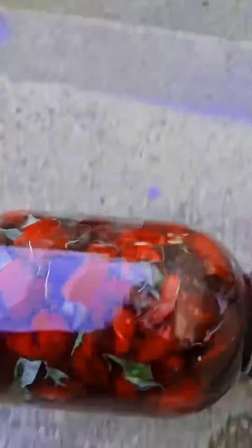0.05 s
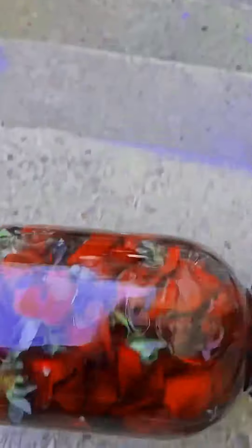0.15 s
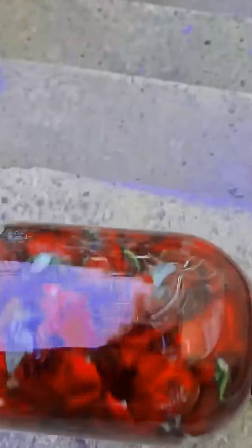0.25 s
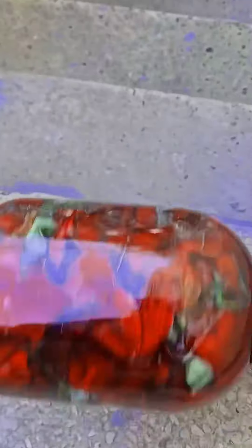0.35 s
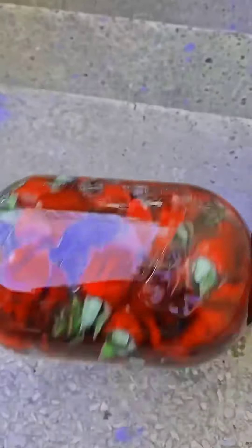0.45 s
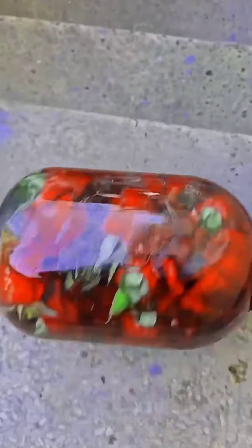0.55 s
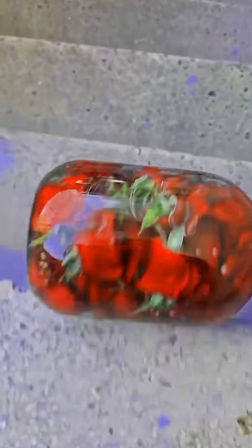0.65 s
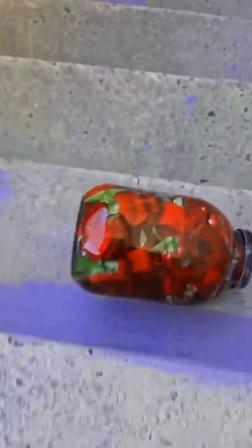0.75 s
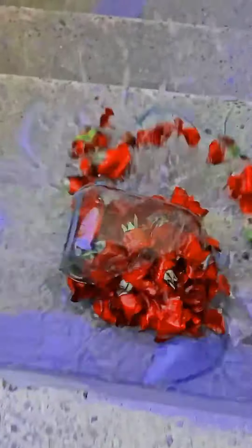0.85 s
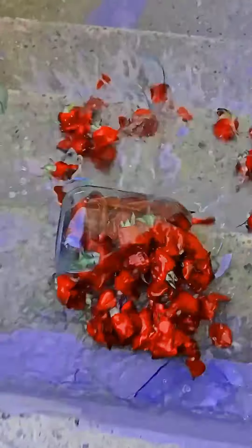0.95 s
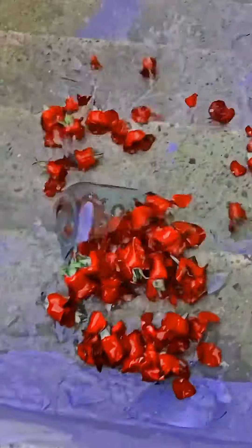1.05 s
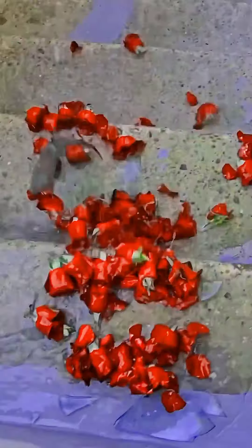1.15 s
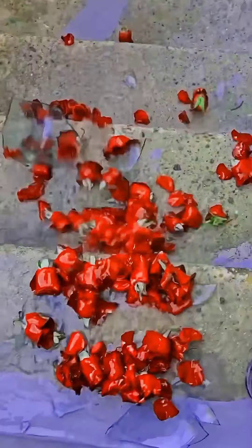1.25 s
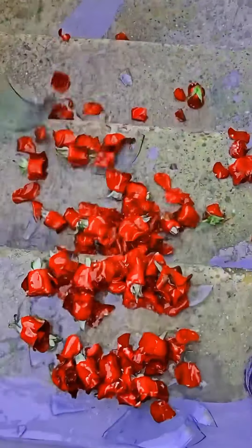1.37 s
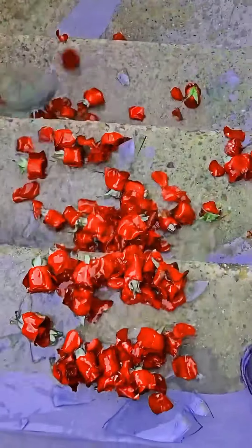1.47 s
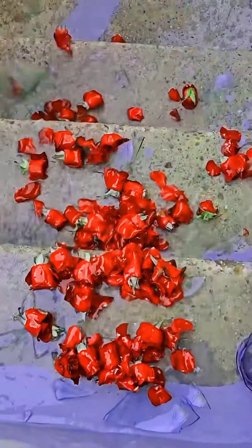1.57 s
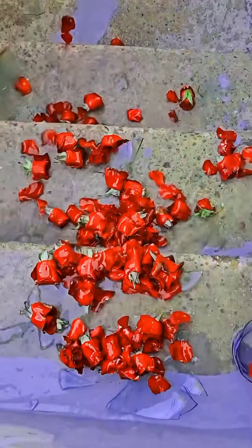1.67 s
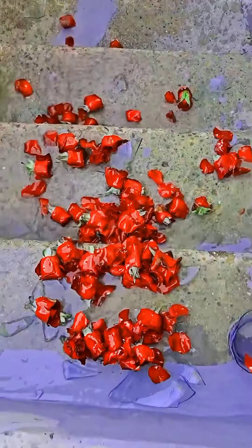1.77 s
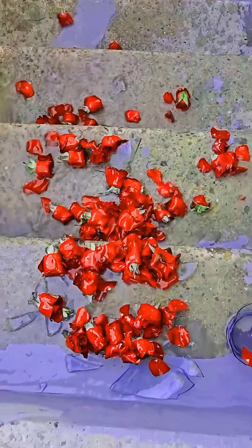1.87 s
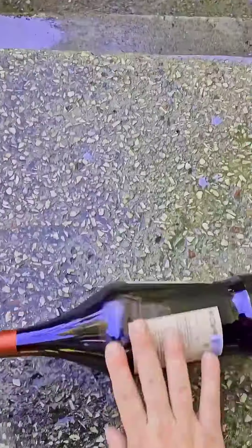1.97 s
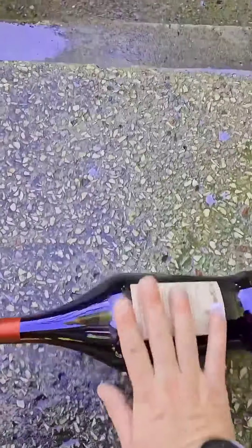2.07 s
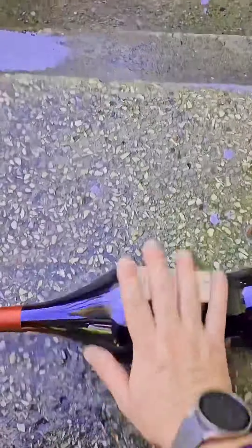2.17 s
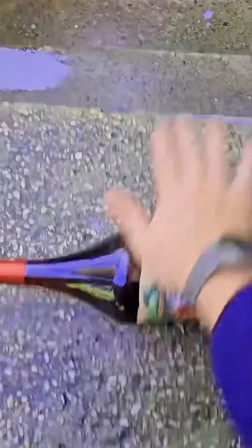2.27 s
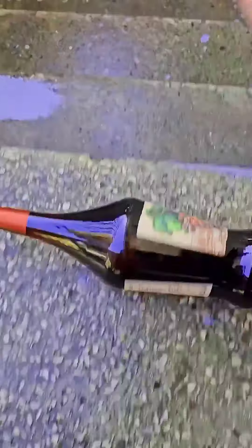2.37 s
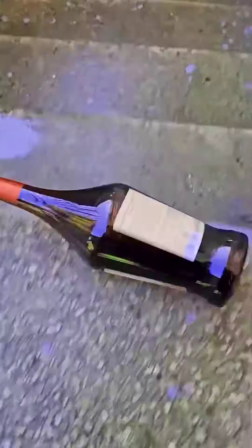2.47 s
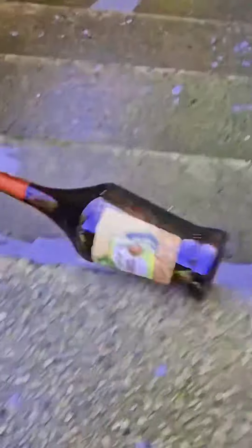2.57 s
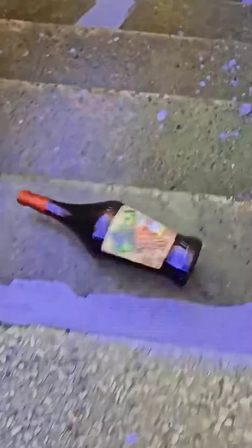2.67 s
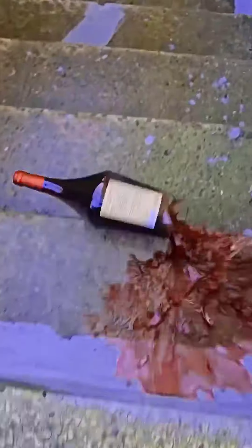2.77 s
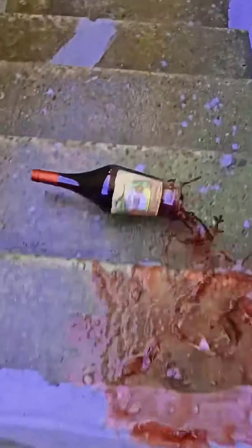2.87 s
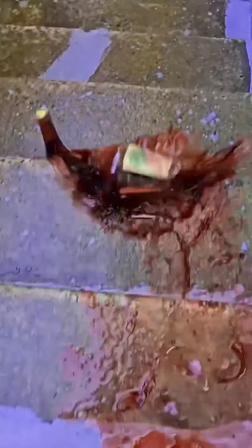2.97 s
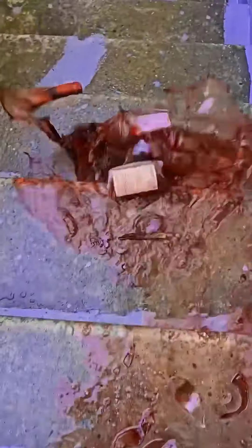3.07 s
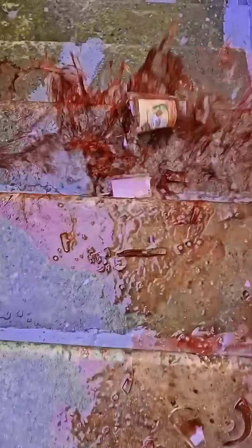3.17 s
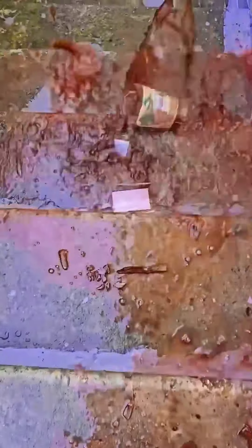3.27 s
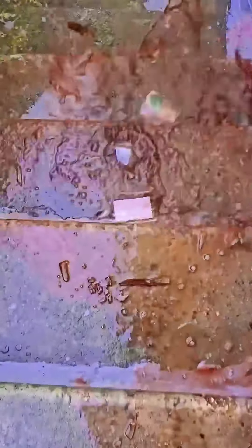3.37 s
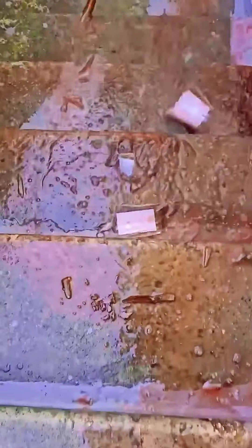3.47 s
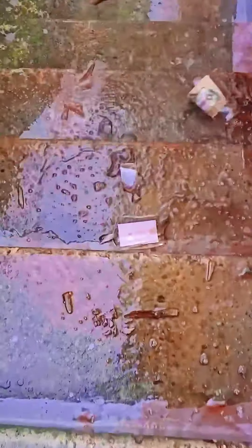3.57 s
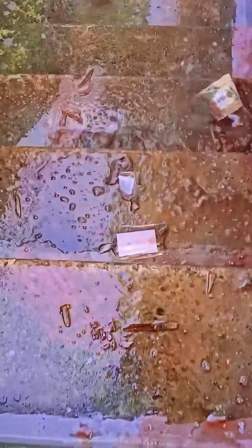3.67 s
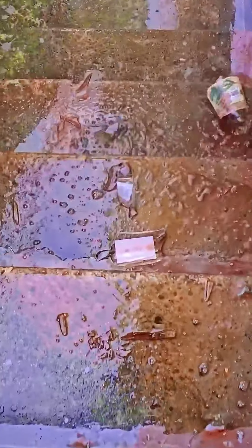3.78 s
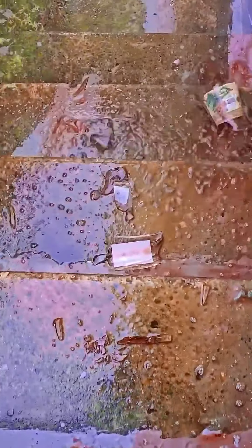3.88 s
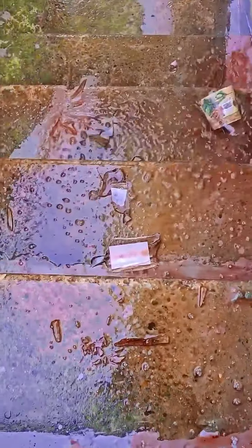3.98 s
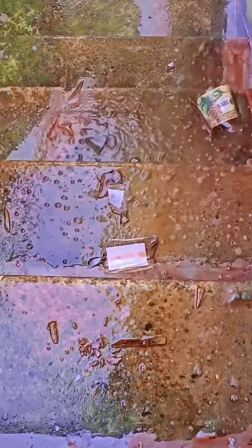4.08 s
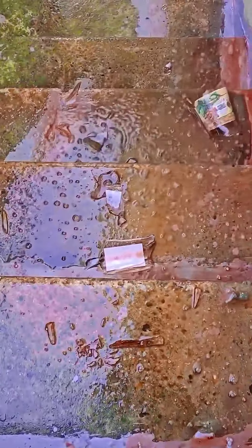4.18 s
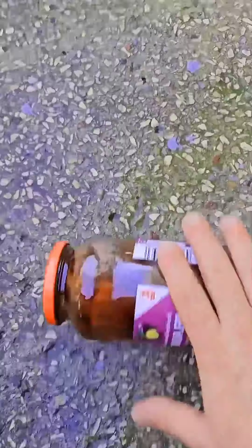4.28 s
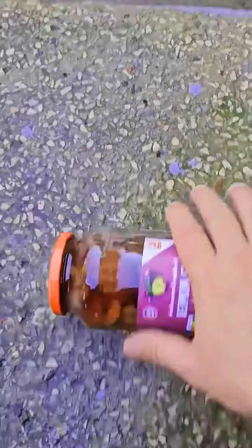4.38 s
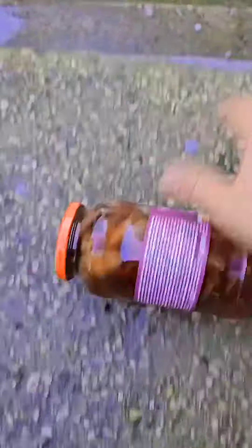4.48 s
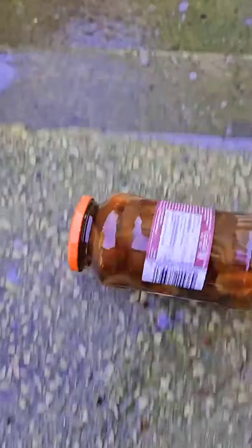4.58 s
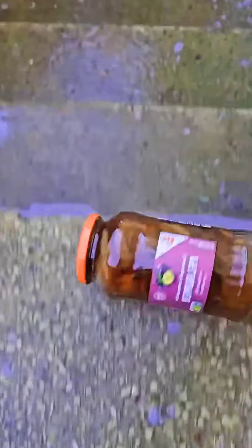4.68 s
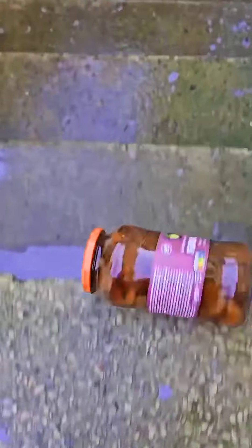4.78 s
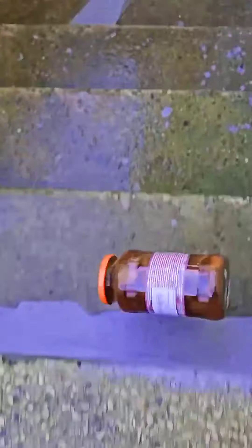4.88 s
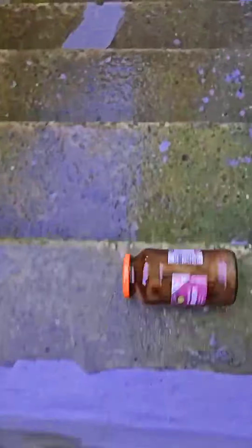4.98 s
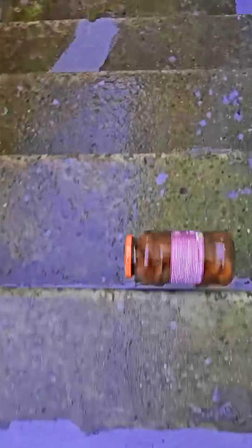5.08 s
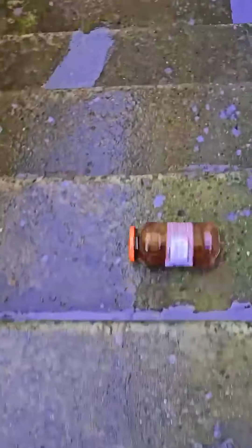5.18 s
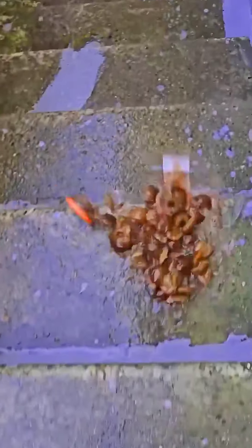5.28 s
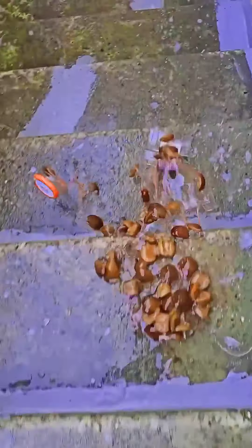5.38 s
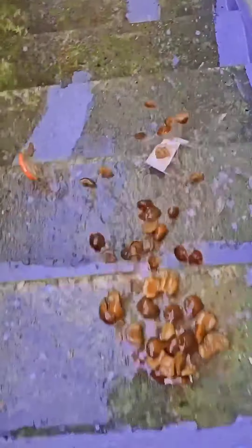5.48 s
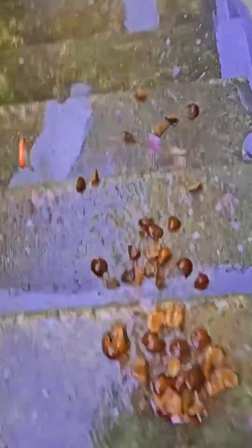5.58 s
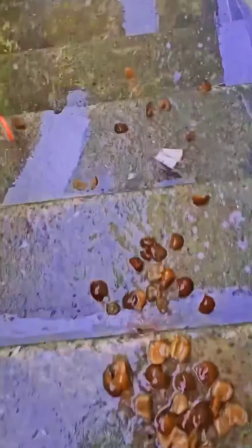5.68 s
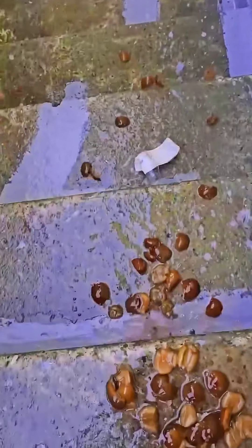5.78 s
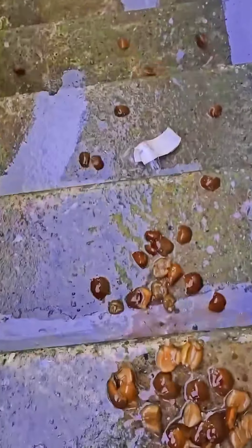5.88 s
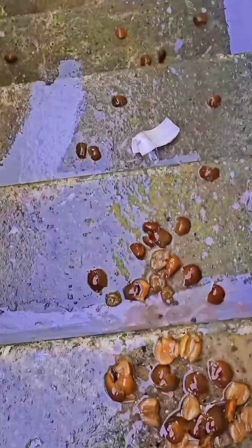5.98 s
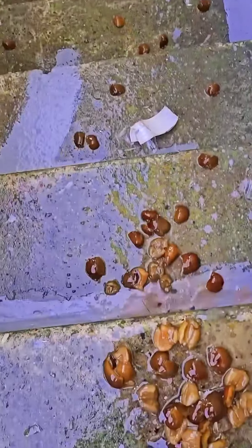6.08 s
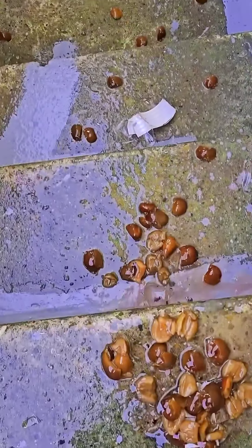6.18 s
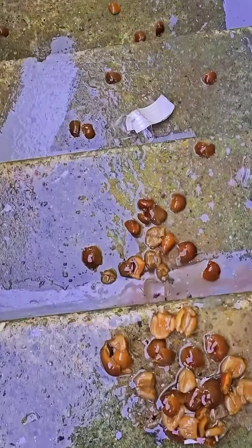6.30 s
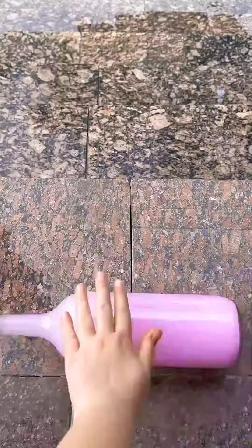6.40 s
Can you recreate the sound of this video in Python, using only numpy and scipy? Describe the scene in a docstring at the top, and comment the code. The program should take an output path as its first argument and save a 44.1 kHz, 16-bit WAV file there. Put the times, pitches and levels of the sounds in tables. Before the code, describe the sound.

Close outdoor sound of glass breaking on concrete stairs. A large filled jar rolls with a gritty rumble and shatters into a long, bright jangle of shards. A wine bottle then rattles, bursts and gurgles, its thick base ringing as it bounces. Finally a smaller jar rolls, knocks hard and bursts with a wet thump, scattering chips and clonking its metal lid. Short stairway echo, low air rumble.

```python
"""Over a low outdoor rumble a glass jar rolls on rough concrete, knocks against stone steps and bursts.
A wine bottle and a second jar follow. Rolling is a train of damped contact pulses; each burst is shaped
noise in four bands with cracks, chips and wet contents, and the wine gurgles as rising bubbles. Shards, the
bottle's base and a metal lid are sums of decaying modes. The stairway adds a short echo."""
import sys
import numpy as np
from scipy import signal
from scipy.fft import rfft, irfft
from scipy.io import wavfile
from scipy.ndimage import uniform_filter1d

SR = 44100
rng = np.random.default_rng(int(sys.argv[2]) if len(sys.argv) > 2 else 0)


def master(y):
    """Save y as 16-bit WAV."""
    cut = np.clip(np.atleast_2d(y).T, -1, 1)
    pcm = np.round(cut * 32767)  # scale
    wavfile.write(sys.argv[1], SR, pcm.astype(np.int16))


N = 284136
T = np.arange(N) / SR
FREQS = np.fft.rfftfreq(N, 1 / SR)
TOP_HZ = 16100  # top of the recorded range


def undb(db):
    """Decibel law: 20 dB is a factor of ten in amplitude."""
    return 10 ** (np.asarray(db) / 20)


def unit(x):
    """Normalisation to a root mean square of one."""
    return x / np.sqrt(np.mean(x ** 2))


def add(out, s, sound):
    """Superposition: mix a sound in at time s."""
    i = max(int(s * SR), 0)
    n = max(min(sound.shape[-1], N - i), 0)
    out[:, i:i + n] += sound[..., :n]


def pan(db):
    """Level difference: gains of left and right, left stronger by db."""
    return unit(undb(np.array([[db], [-db]]) / 2))


def lagged(x, count):
    """Time difference: sound from the left reaches the right microphone a few samples later."""
    return np.array([x[0], np.roll(x[1], count)])


def band(x, lo_hz, hi_hz, order=3):
    """Causal band-pass filtering."""
    edges = [lo_hz, min(hi_hz, SR / 2 - 100)]
    return signal.sosfilt(signal.butter(order, edges, "band", fs=SR, output="sos"), x)


def spread(pair, side):
    """Decorrelation: two unrelated signals as middle and side."""
    return unit(pair[0] + side * pair[1] * np.array([[1], [-1]]))


def moments(start, end, rate):
    """Jittered timing: irregular times from start to end, about rate a second."""
    slots = np.arange(start, end, 1 / rate)
    return slots + rng.random(len(slots)) / rate


def flicker(depth_db, step_s):
    """Random modulation: a gain that drifts to a new random level every step_s seconds."""
    steps = np.arange(0, T[-1], step_s)
    levels = np.minimum(rng.standard_normal(len(steps)), 1.5)
    return undb(depth_db * np.interp(T, steps, levels))


def ring(modes, width=0.063, attack=0.00016):
    """Modal decay: modes (Hz, dB, t60 s), each reaching the two microphones with its own phase."""
    hz, db, t60 = np.transpose(modes)
    t = T[:int(t60.max() * SR)]
    phase = rng.uniform(0, 2 * np.pi, len(hz)) + width * rng.standard_normal((2, len(hz)))
    pole = np.exp((2j * np.pi * hz - np.log(1000) / t60) / SR)
    decay = np.cumprod(np.repeat(pole[:, None], len(t), axis=1), axis=1)
    strength = (hz < TOP_HZ) * undb(db) * np.exp(1j * phase)
    return (strength @ decay).imag * (1 - np.exp(-t / attack))


def knock(hz, db, peak_cycles=0.52, sharp=1.9):
    """Heavy damping: the blow dies within a few swings; sharp narrows its envelope."""
    cycles = T[:int(10 * SR / hz)] * hz
    envelope = (cycles / peak_cycles * np.exp(1 - cycles / peak_cycles)) ** sharp
    return undb(db) * np.sin(2 * np.pi * cycles) * envelope


def shard(hz, db, t60, partner_db, attack, count=5):
    """Inharmonic plate modes: one strong mode and a few others at unrelated pitches."""
    other_hz = rng.uniform(min(hz * 1.1, 4000), min(hz * 3.6, TOP_HZ), count)
    other_db = db + partner_db + 3 * rng.standard_normal(count)
    others = np.c_[other_hz, other_db, t60 * rng.uniform(.5, 1, count)]
    return ring(np.vstack([(hz, db, t60), others]), width=1.13, attack=attack)


def chatter(note, depth, top_hz):
    """Amplitude modulation: a ringing piece trembles against the stone, so its tone flutters."""
    return note * (1 + depth * unit(band(rng.standard_normal(note.shape[1]), 30, top_hz, order=1)))


def choked(note, free_s, choke_s):
    """Contact damping: a note rings freely, then a new contact damps it."""
    return note * np.exp(-np.maximum(T[:note.shape[1]] - free_s, 0) / choke_s)


def scrape(db, fall_s):
    """Friction noise: grit crushed where glass touches down."""
    t = T[:int(.04 * SR)]
    grit = rng.standard_normal((2, len(t))) * rng.exponential(size=len(t))
    return unit(band(grit, 2000, 21000, order=2)) * undb(db) * np.exp(-t / fall_s)


def crackle(lo_hz, hi_hz, side, rate, ringing, t60=0.036, count=40):
    """Shot noise: random cracks of uneven size in one band, with many fragments ringing on."""
    uneven = undb(1.1 * np.minimum(rng.exponential(size=(2, N)), 4))
    sizes = uneven * flicker(depth_db=1.0, step_s=.003)
    cracks = (rng.random((2, N)) < rate / SR) * sizes * rng.choice([-1, 1], (2, N))
    fragments = ring(np.c_[rng.uniform(lo_hz, hi_hz, count), np.zeros(count), np.full(count, t60)])
    rung = unit(signal.fftconvolve(cracks, fragments, axes=1)[:, :N])
    return spread(unit(band(cracks, lo_hz, hi_hz)) + ringing * rung, side)


def patchy(x, depth_db, size=256):
    """Spectral modulation: fragments and drops come and go, so each narrow band flickers by itself."""
    cells = signal.stft(x, nperseg=size)[2]
    field = uniform_filter1d(rng.standard_normal(cells.shape[1:]), size=3, axis=0)
    field = uniform_filter1d(field, size=5, axis=1)
    gain = unit(undb(depth_db * np.minimum(unit(field), 2)))
    return signal.istft(cells * gain, nperseg=size)[1][:, :N]


# spectrum of the outdoor background: (frequency [Hz], relative level per Hz [dB])
AIR_SPECTRUM = [(20, -9.5), (50, 5), (100, 0), (220, -11), (700, -23), (2000, -26), (5000, -42.5),
                (16000, -43)]
# its course: (time [s], level [dB])
AIR_COURSE = [(0, -35.5), (.9, -38.5), (1.9, -41), (2.65, -36), (3.4, -41), (4.2, -43), (4.82, -37.5),
              (5.25, -43), (5.8, -43.5), (6.2, -48)]


def air():
    """Spectral shaping of noise: outdoor rumble, nearly alike in both ears in the bass, wider in its hiss."""
    hz, db = np.transpose(AIR_SPECTRUM)
    colour = undb(np.interp(np.log(FREQS + 1), np.log(hz), db))
    mid, side = rfft(rng.standard_normal((2, N))) * colour
    side = side * np.clip(FREQS / 2000, .23, .9)
    stereo = unit(irfft(np.array([mid + side, mid - side]), N))
    return stereo * undb(np.interp(T, *np.transpose(AIR_COURSE)))


# the three vessels, jar, bottle, jar: (set rolling at time [s], pitch of a 0 dB contact [Hz])
VESSELS = [(0, 699), (2.02, 1223), (4.25, 1380)]
CONTACT_DB_PER_OCTAVE = 19.5  # extra force that raises the pitch an octave


def contact_hz(s, db):
    """Nonlinear contact: a harder blow of the vessel in play is shorter, so its pitch is higher."""
    reference_hz = [hz for start, hz in VESSELS if start <= max(s, VESSELS[0][0])][-1]
    return reference_hz * 2 ** (db / CONTACT_DB_PER_OCTAVE)


# force of the rolling, one curve a vessel: (time [s], level [dB])
ROLL_FORCES = [
    [(0, -31.5), (.15, -30), (.25, -35), (.5, -38.5), (.66, -28), (.8, -45)],
    [(2.03, -41), (2.18, -35), (2.3, -25.5), (2.52, -26.5), (2.56, -32.5)],
    [(4.29, -40.5), (4.46, -36), (4.54, -24), (4.62, -25), (4.83, -28), (4.9, -41)],
]
# hard knocks of whole glass on grit and step edges: (time [s], relative level [dB])
KNOCKS = [(0.0183, -7.5), (.074, -5.5), (0.1264, -8.5), (0.16, -12.5), (.465, -7.5), (0.4812, -10),
          (0.5113, -10), (2.2248, -16.5), (2.2637, -3), (2.286, 0.5), (2.31, -16), (2.337, -13),
          (2.3539, -4.5), (2.3778, -4), (2.382, -8.5), (2.409, -16), (2.4274, -3), (2.451, -9),
          (2.47, -4.5), (2.4756, 0.5), (2.502, -17), (2.5126, 3), (2.523, -15), (2.6724, 1), (2.7169, -8),
          (2.9226, -3), (4.286, -20.5), (4.4804, -8.5), (4.53, -9.5), (4.591, -2), (4.6069, 2), (4.622, 1),
          (4.6416, 1.5), (4.669, 2), (4.7078, -1.5), (4.739, -2.5), (4.8, -7), (4.8351, -6), (5.0211, 1),
          (5.0365, 3.5), (5.2764, -4.5)]


def rolling(rate=230, scatter_db=7.5, grit_db=-21, patchy_db=7.0, wall_db=-8, wall_s=0.0021, bed_db=-3.0,
            pitch_spread=0.4, rumble_db=-9, knock_db=-3.0, hardness_db=18):
    """Rolling excitation: grit bumps shake the glass wall, sand crunches and the stone rumbles."""
    bumps, speed = np.zeros((2, N)), np.zeros(N)
    for roll in ROLL_FORCES:
        s, db = np.transpose(roll)
        speed += undb(np.interp(T, s, db, left=-np.inf, right=-np.inf))
        times = moments(s[0], s[-1], rate)
        for t, (size, pitch) in zip(times, rng.standard_normal((len(times), 2))):
            force_db = np.interp(t, s, db)
            hz = contact_hz(t, force_db + hardness_db) * np.exp(pitch_spread * min(pitch, 1.3))
            # higher bumps are briefer, so they are raised to keep their energy
            bump_db = force_db + bed_db + scatter_db * min(size, 1.5) + 10 * np.log10(hz / rate)
            add(bumps, t, knock(hz, bump_db))
    for s, db in KNOCKS:
        add(bumps, s, knock(contact_hz(s, db), db + knock_db))
    t = T[:int(.04 * SR)]
    wall = rng.standard_normal((2, len(t))) * np.exp(-t / wall_s) * (t > .001)
    wall *= undb(wall_db) / np.sqrt(np.sum(wall[0] ** 2))
    shaken = signal.fftconvolve(bumps, wall, axes=1)[:, :N]
    # the crunch follows the pressure of each bump, stronger on sandy patches
    sand = undb(grit_db) * flicker(patchy_db, step_s=0.013)
    pressure = uniform_filter1d(np.abs(bumps), size=200) + 0.81 * speed
    coarse = crackle(1540, 7000, side=1.0, rate=2300, ringing=0.36)
    fine = undb(-10.0) * crackle(4800, 24000, side=0.94, rate=260, ringing=0.23)
    crunch = pressure * sand * (coarse + fine)
    rumble = speed * spread(band(rng.standard_normal((2, N)), 53, 120, order=1), side=0.21)
    return lagged(bumps + shaken + crunch + undb(rumble_db) * rumble, count=2) * pan(0.97)


# echo of the stairway: (frequency [Hz], level [dB], t60 [s])
ECHO_BANDS = [(150, -9, 0.057), (523, -8, 0.42), (1290, -6, 0.092), (3060, -9.5, 0.27), (7040, -16.5, 0.7),
              (15000, -47, 0.16)]


def stairway(dry, delay=0.0038):
    """Reverberation as convolution: scattered reflections from steps and walls, each band with its decay."""
    t = T[:int(.6 * SR)]
    hz, db, t60 = np.transpose(ECHO_BANDS)
    log_f = np.log(np.fft.rfftfreq(len(t), 1 / SR) + 1)
    noise = rfft(rng.standard_normal((2, len(t))))
    response = 0
    for share, level_db, length in zip(np.eye(len(hz)), db, t60):
        decay = undb(-60 * t / length) * np.minimum(t / delay, 1) ** 2
        narrow = irfft(noise * np.interp(log_f, np.log(hz), share), len(t))
        response = response + narrow * decay * undb(level_db) / np.sqrt(np.sum(decay ** 2))
    return signal.fftconvolve(dry, response, axes=1)[:, :N]


# a crack, where glass strikes stone and splits, a hard slap of spilled wine, or a sharp tick or scratch of grit
# under a rolling vessel: rise; thud under its body and fizz under its edge
CRACK_RISE_S, CRACK_THUD_DB, CRACK_FIZZ_DB = 0.0017, -10.5, -6.5
# cracks, sharp grit ticks and scratches under the rolling vessels, and two slaps of the wine near 3.1 and 3.2
# s: (time [s], fall [s], dull body [dB], sharp edge [dB])
CRACKS = [(0.126, 0.0039, -30, -28.5), (0.2336, 0.0015, -16.5, -9.5), (0.276, 0.011, -21, -17.5),
          (0.361, 0.003, -41, -32), (0.387, 0.01, -33, -34.5), (0.534, 0.023, -34.5, -34),
          (0.961, 0.0047, -26, -22), (2.399, 0.0097, -42, -20.5), (2.426, 0.081, -39, -37.5),
          (2.5816, 0.0058, -21, -35), (2.669, 0.021, -25, -24.5), (2.715, 0.0015, -31, -11),
          (2.784, 0.0027, -12.5, -17.5), (2.874, 0.0069, -56, -26.5), (3.121, 0.04, -24.5, -24),
          (3.222, 0.02, -24, -25), (3.427, 0.065, -33.5, -26), (3.63, 0.031, -34.5, -29),
          (3.767, 0.022, -30, -33.5), (4.833, 0.0029, -26, -35), (5.02, 0.0043, -15.5, -21.5),
          (5.036, 0.032, -23, -35), (5.542, 0.0016, -29, -24), (5.96, 0.0041, -24, -18.5),
          (6.2855, 0.0082, -31, -25.5), (6.298, 0.0093, -36.5, -31.5), (6.376, 0.029, -42.5, -48.5)]
# a burst is a crack that opens the vessel: (thud, body, crack, fizz [dB])
BURST_COLOUR = (2, 2, 2.5, -2)
BURST_FALL_S = 0.0079
# bursts: (time [s], level [dB])
BURSTS = [(0.89, -26), (2.712, -20.5), (2.922, -19.5), (5.275, -16)]
# the contents spill just after, with a level against the burst
SPILL_DELAY_S, SPILL_RISE_S, SPILL_FALL_S, SPILL_DB = 0.011, 0.0045, 0.042, -9.5
# wet contents and glass sliding onto a step together: (thud, body, crack, fizz [dB])
SPLASH_COLOUR = (-10.5, -3.5, 0, -6)
SPLASH_FALL_S = 0.026  # all die away alike
# splashes and scrapes: (time [s], rise [s], level [dB])
SPLASHES = [(0.262, 0.0113, -25), (0.695, 0.0077, -36), (.856, 0.01916, -13), (.995, 0.004, -22.5),
            (1.018, 0.00492, -21), (1.177, 0.008, -18.5), (1.606, 0.00987, -17.5), (1.781, 0.0036, -28.5),
            (1.822, 0.01274, -24), (3.12, 0.0029, -19), (3.235, 0.003, -21), (3.25, 0.008, -29.5),
            (3.423, 0.015, -24.5), (3.477, 0.00786, -28), (5.331, .012, -30), (5.483, 0.004, -22.5),
            (5.534, 0.0034, -26), (5.656, 0.015, -28.5), (5.717, 0.0023, -28), (5.768, .004, -31),
            (5.88, .008, -37.5)]
# a handful of dry fragments landing: (thud, body, crack, fizz [dB])
SHOWER_COLOUR = (-25.5, -14.5, -3.5, -4)
SHOWER_RISE_SHARE = 0.1  # rise over fall: a longer shower also takes longer to build
# showers: (time [s], fall [s], level [dB])
SHOWERS = [(1.127, 0.021, -17), (1.243, 0.026, -15.5), (1.341, 0.078, -28.5), (1.397, 0.019, -19.5),
           (1.485, 0.088, -24), (2.014, 0.0043, -23), (3.781, 0.0058, -26), (3.907, 0.068, -37),
           (3.99, 0.031, -36.5), (4.517, 0.0079, -35.5), (5.455, 0.0041, -17.5), (5.464, 0.0026, -25),
           (5.769, 0.034, -30), (5.801, 0.021, -21.5), (5.869, 0.0326, -25), (5.947, 0.012, -20.5)]


def breakage():
    """Attack and decay: each event as (s, rise s, fall s, dB of thud, body, crack and fizz)."""
    for s, fall, body_db, edge_db in CRACKS:
        dbs = np.array([body_db + CRACK_THUD_DB, body_db, edge_db, edge_db + CRACK_FIZZ_DB])
        yield s, CRACK_RISE_S, fall, dbs
    for s, db in BURSTS:
        dbs = db + np.array(BURST_COLOUR)
        yield s, CRACK_RISE_S, BURST_FALL_S, dbs
        yield s + SPILL_DELAY_S, SPILL_RISE_S, SPILL_FALL_S, dbs + SPILL_DB
    for s, rise, db in SPLASHES:
        yield s, rise, SPLASH_FALL_S, db + np.array(SPLASH_COLOUR)
    for s, fall, db in SHOWERS:
        yield s, SHOWER_RISE_SHARE * fall, fall, db + np.array(SHOWER_COLOUR)


def crashes(lead_db=-18, lead_s=0.01, patchy_db=5.5):
    """Power summation of noise bands: contents thud and splash while the glass cracks and fizzes."""
    thud = undb(-2.5) * crackle(85.4, 380, side=0.11, rate=2600, ringing=0.13) * pan(0.44)
    body = undb(0.13) * crackle(553, 2407, side=0.7, rate=1800, ringing=0.72, count=24) * pan(1.4)
    crack = undb(-0.6) * crackle(2663, 6980, side=1.0, rate=2200, ringing=0.12) * pan(1.2)
    low_fizz = crackle(6910, 10200, side=0.73, rate=2300, ringing=0.65, count=24)
    high_fizz = crackle(11000, 22000, side=0.98, rate=710, ringing=1.0)
    textures = [thud, body, crack, (low_fizz + high_fizz) * pan(5.3)]
    power = np.zeros((len(textures), N))
    t = T[:SR // 2] - .05
    for s, rise, fall, dbs in breakage():
        burst = np.clip(t / rise, 0, np.exp(-np.maximum(t - rise, 0) / fall))
        # faint noise leads into each event
        lead = undb(lead_db) * np.exp(-np.abs(t) / lead_s)
        add(power, s + t[0], undb(dbs)[:, None] ** 2 * (burst ** 2 + lead ** 2))
    layers = [np.sqrt(p) * patchy(texture, patchy_db) for p, texture in zip(power, textures)]
    return lagged(sum(layers), count=3)


# small, high shards fly further to the left: centred pitch, and left minus right per octave above it
SHARD_CENTRE_HZ, SHARD_DB_PER_OCTAVE = 2700, 4.5


def landing(hz):
    """Level difference by pitch: left and right gains of a piece."""
    return pan(SHARD_DB_PER_OCTAVE * np.log2(hz / SHARD_CENTRE_HZ))


# a glass edge snaps off against the stone: (time [s], pitch [Hz], relative level [dB])
SNAPS = [(0.234, 2800, -7.5), (0.276, 2600, -14), (0.2897, 3200, -11), (.3605, 3100, -21),
         (3.124, 1100, -14.5), (3.1286, 900, -13), (3.1678, 4000, -15), (3.2224, 1400, -14.5),
         (3.2388, 3500, -16), (3.437, 4200, -22), (5.4546, 3600, -28), (5.4702, 7600, -9),
         (5.4855, 2300, -21), (5.5347, 9000, -5), (6.379, 3100, -21.5)]


def snaps(grit_db=-13):
    """Impulsive fracture: a few hard swings of the glass and a pinch of crushed grit."""
    out = np.zeros((2, N))
    for s, hz, db in SNAPS:
        add(out, s, knock(hz, db, peak_cycles=0.74, sharp=1.0) * landing(hz))
        add(out, s, scrape(db + grit_db, fall_s=0.0018) * landing(hz))
    return out


def chips(gain_db=1, scatter_db=9, lo_hz=2200, hi_hz=9000, flight_s=.13, count=9):
    """Scattered impacts: bursts and splashes throw tiny chips, which land as separate dry ticks."""
    out = np.zeros((2, N))
    for s, *_, db in BURSTS + SPLASHES:
        for wait, pitch, place in rng.random((count, 3)):
            hz = lo_hz * (hi_hz / lo_hz) ** pitch
            tick = knock(hz, db + gain_db - scatter_db * wait, peak_cycles=0.33, sharp=1.0)
            add(out, s + flight_s * wait, tick * pan(14 * place - 5))
    return out


def plops(gain_db=-8, scatter_db=10, lo_hz=260, hi_hz=1000, flight_s=.1, count=5):
    """Soft impact: a jar's splashes throw lumps that drop back onto the stone, the later the weaker."""
    out = np.zeros((2, N))
    for s, rise, db in SPLASHES:
        if VESSELS[1][0] < s < VESSELS[2][0]:  # the bottle holds no lumps
            continue
        for wait, pitch in rng.random((count, 2)):
            hz = lo_hz * (hi_hz / lo_hz) ** pitch
            lump = knock(hz, db + gain_db - scatter_db * wait, peak_cycles=0.62, sharp=0.6)
            add(out, s + rise + flight_s * wait, lump * pan(1.4))
    return out


# how long a shard rings for its pitch: (frequency [Hz], t60 [s])
SHARD_T60 = [(2000, 0.035), (4500, 0.085), (8000, 0.105), (9200, 0.04)]


def clinks(gain_db=-2, scatter_db=10, lo_hz=2300, hi_hz=11500, flight_s=0.039, damped=0.87, count=7):
    """Damped plate modes: fragments of showers and splashes ring briefly in the wet heap, ever weaker."""
    out = np.zeros((2, N))
    for s, _, db in SHOWERS + SPLASHES:
        for wait, pitch in rng.random((count, 2)):
            hz = lo_hz + (hi_hz - lo_hz) * pitch
            t60 = damped * np.interp(hz, *np.transpose(SHARD_T60))
            clink_db = db + gain_db - scatter_db * wait
            fragment = shard(hz, clink_db, t60, partner_db=-21.0, attack=0.0021, count=3)
            add(out, s + flight_s * wait ** 2, fragment * pan(3.8 + 5 * rng.standard_normal()))
    return out


# the largest shards landing: (time [s], main mode [Hz], relative level [dB])
SHARDS = [(.894, 2000, -11.5), (0.956, 3145, -23), (0.97, 7400, -24.5), (.996, 9100, -20.5),
          (1.024, 3260, -19), (1.069, 7700, -31), (1.086, 8030, -22), (1.128, 4470, -15.5),
          (1.132, 2354, -16), (1.211, 7150, -19), (1.24, 3230, -21), (1.242, 9430, -13.5),
          (1.245, 4260, -23), (1.261, 6860, -22), (1.271, 3700, -22), (1.296, 4260, -20),
          (1.34, 14870, -21), (1.343, 8210, -15), (1.358, 5060, -26), (1.399, 10000, -20.5),
          (1.469, 4280, -22.5), (1.487, 11430, -12.5), (1.494, 6250, -22.5), (1.529, 6090, -29),
          (1.555, 7600, -23.5), (1.611, 5000, -31), (1.62, 8150, -30), (1.779, 2670, -24),
          (1.866, 12000, -22.5), (1.901, 8870, -22), (1.93, 4480, -25.5), (1.948, 4200, -26),
          (2.01, 9330, -18), (3.167, 5770, -25), (3.257, 7180, -19), (3.434, 3930, -24.5),
          (3.546, 4445, -30), (5.465, 4204, -20), (5.468, 7685, -17.5), (5.467, 14400, -15),
          (5.468, 5360, -17.5), (5.486, 2520, -16.5), (5.489, 6660, -20), (5.532, 9100, -14.5),
          (5.565, 5390, -17.5), (5.682, 8140, -25.5), (5.688, 9660, -20.5), (5.809, 14500, -24),
          (5.81, 5300, -19.5), (5.871, 9360, -26), (5.949, 10090, -11), (6.047, 4070, -31),
          (6.087, 10370, -24.5)]


def shards(gain_db=6.0, bounce_db=-7, hop_s=0.032, scrape_db=-10, settle_s=0.041, free_db=-5):
    """Contact-damped plates: large pieces scrape down, ring unsteadily, settle and rock onto another edge."""
    out = np.zeros((2, N))
    for s, hz, db in SHARDS:
        t60 = np.interp(hz, *np.transpose(SHARD_T60))
        note = shard(hz, db + gain_db, t60, partner_db=-14.0, attack=0.0022)
        note = chatter(note, depth=0.32, top_hz=260)
        # only part of the ring is lost as the piece settles
        settling = undb(free_db) * note + (1 - undb(free_db)) * choked(note, 0, settle_s)
        add(out, s, scrape(db + scrape_db, fall_s=0.0064) * landing(hz))
        add(out, s, settling * landing(hz))
        rocked_hz = hz * rng.uniform(1.0, 1.03)
        rocked = shard(rocked_hz, db + bounce_db, t60, partner_db=-7.5, attack=0.0014)
        add(out, s + hop_s * rng.uniform(0.36, 1.0), rocked * landing(hz))
    return out


# a metal lid: modes (frequency ratio, relative level [dB], t60 [s])
LID_MODES = [(.73, 1.5, 0.054), (.91, 10, 0.028), (1, 13.5, 0.036), (1.08, -7, 0.19), (1.45, -16, 0.06),
             (2.13, -15, 0.16), (2.77, -4, 0.06)]
# its hits: (time [s], frequency of ratio 1 [Hz], relative level [dB])
LID_HITS = [(1.186, 551, -21), (5.536, 782, -31), (5.644, 567, -36.5), (5.721, 776, -24), (5.946, 820, -30),
            (6.287, 772, -24.5), (6.378, 808, -39.5)]
# soft contents slapping the stone: (time [s], pitch [Hz], relative level [dB])
THUMPS = [(0.898, 300, -18), (1.187, 593, -7), (1.546, 434, -23.5), (1.63, 603, -17), (1.619, 232, -24),
          (1.835, 673, -24.5), (2.555, 190, -22), (2.724, 527, -20), (2.94, 232, -23.5), (2.966, 114, -21),
          (2.991, 100, -25.5), (5.279, 270, -10.5), (5.279, 150, -27), (5.306, 284, -21.5),
          (5.578, 502, -26.5), (5.602, 108, -29), (5.645, 450, -28)]


def lids_and_contents():
    """Modal ringing against heavy damping: hollow clonks of the lids, dull slaps of the filling."""
    out = np.zeros((2, N))
    for s, hz, db in LID_HITS:
        modes = [(hz * ratio, db + mode_db, t60) for ratio, mode_db, t60 in LID_MODES]
        add(out, s, ring(modes, width=1.0, attack=0.0023))
    for s, hz, db in THUMPS:
        add(out, s, knock(hz, db, peak_cycles=0.52, sharp=0.63))
    return out


# small splinters after each vessel, choked where it is wet:
# (from [s], to [s], starting level [dB], fading [dB per s], typical t60 [s])
SKITTERS = [(0.921, 2.02, -29, 5.5, 0.098), (2.951, 3.601, -42.5, -5, 0.052), (5.305, 5.963, -39, 5, 0.034)]


def skitter(rate=145, scatter_db=6.0, ring_db=-2.0, tick_db=-7, lo_hz=2800, hi_hz=10500, hop_s=.022,
            rebound=.7, tap_db=-9, tap_hz=1100, tap_spread=0.475, hops=3, nearest=9):
    """Inelastic rebound: splinters tap down and bounce in ever shorter, weaker hops of tick and ring."""
    out = np.zeros((2, N))
    for start, end, start_db, fade, t60 in SKITTERS:
        for k, s in enumerate(moments(start, end, rate)):
            db = start_db - fade * (s - start) + scatter_db * min(rng.standard_normal(), 1.2)
            place = pan(3 + 5 * rng.standard_normal())
            # every third piece takes the pitch of a large shard that lands near this time
            nearby = sorted(SHARDS, key=lambda row: abs(row[0] - s))[rng.integers(nearest)]
            hz = rng.uniform(lo_hz, hi_hz) if k % 3 else nearby[1]
            piece_t60 = t60 * (.5 + rng.random())
            note = shard(hz, db + ring_db, piece_t60, partner_db=-8.5, attack=0.00088, count=4)
            note = chatter(note, depth=0.2, top_hz=200)
            tick = scrape(db + tick_db, fall_s=0.0022)
            dull_hz = tap_hz * np.exp(tap_spread * rng.standard_normal())
            add(out, s, knock(dull_hz, db + tap_db, peak_cycles=1.73, sharp=0.87))
            hop = hop_s * (.5 + rng.random())
            for strength in rebound ** np.arange(hops):
                add(out, s, strength * place * note)
                add(out, s, strength * place * tick)
                s += hop * strength
    return out


# the whole bottle's wall: (frequency [Hz], relative level [dB], t60 [s])
BOTTLE_MODES = [(1450, -4.5, 0.16), (1600, 15, 0.022), (1850, 1, 0.023), (2650, -6, 0.051),
                (2680, 0, 0.022), (2900, -1, 0.086), (3260, -0.5, 0.051), (5000, 4, 0.083),
                (7690, 5, 0.035)]
# blows that set it ringing: (time [s], relative level [dB], pitch struck hardest [Hz])
BOTTLE_HITS = [(2.203, -27.5, 2900), (2.583, -29.5, 1720), (2.67, -31, 1720), (2.674, -11.5, 2645),
               (2.875, -25, 7900), (2.879, -28, 1880)]
RATTLE_T60 = .04  # the ground damps the rattle of each knock to this t60 [s] at most


def bottle_wall(focus=0.28, rattle_db=-24.0, rattle_hz=2900, scatter_db=3, slosh=0.03):
    """Selective modal excitation: blows favour modes near one pitch; knocks on the ground rattle briefly."""
    out = np.zeros((2, N))
    hz, db, t60 = np.transpose(BOTTLE_MODES)

    def miss_db(near_hz):
        """Detuning loss: the further a mode from the struck pitch, the weaker."""
        return -np.minimum(20 * np.abs(np.log(hz / near_hz)) / focus, 22)

    for s, blow_db, near_hz in BOTTLE_HITS:
        add(out, s, ring(np.c_[hz, db + blow_db + miss_db(near_hz) + 4, t60], width=0.77))
    for s, knock_db in KNOCKS:
        if VESSELS[1][0] < s < VESSELS[2][0]:
            scatter = scatter_db * rng.standard_normal(len(hz))
            struck_db = db + knock_db + rattle_db + miss_db(rattle_hz) + scatter
            sloshed_hz = hz * (1 + slosh * rng.standard_normal(len(hz)))  # the moving wine detunes the wall
            add(out, s, ring(np.c_[sloshed_hz, struck_db + 4, np.minimum(t60, RATTLE_T60)], width=1.0))
    return out


# the bottle leaves the hand and its lowest mode sings freely, then is choked:
# (from [s], to [s], relative level [dB])
BOTTLE_SONG = (2.263, 2.343, -22.5)


def bottle_song(t60=1.3, choke_s=0.01):
    """Free vibration: the lowest wall mode holds on, fluttering as the bottle rolls."""
    out = np.zeros((2, N))
    start, end, db = BOTTLE_SONG
    note = ring([(BOTTLE_MODES[0][0], db, t60)], width=0.63)
    add(out, start, chatter(choked(note, end - start, choke_s), depth=0.35, top_hz=118))
    return out


# wine gushing over the steps:
# (from [s], to [s], starting level [dB], fading [dB per s], typical bubble pitch [Hz])
GUSHES = [(2.723, 2.846, -49, 88, 600), (2.923, 3.067, -25.5, 84, 336), (3.119, 3.2, -20, 176, 760)]


def gurgle(rate=130, pitch_spread=0.46, scatter_db=4, cycles=2.5, glide=0.34):
    """Bubble resonance: the wine folds in air bubbles of all sizes, each rising in pitch as it dies."""
    out = np.zeros((2, N))
    for start, end, start_db, fade, typical_hz in GUSHES:
        times = moments(start, end, rate)
        draws = np.clip(rng.standard_normal((len(times), 2)), -1.6, 1.6)
        for s, (size, pitch) in zip(times, draws):
            hz = typical_hz * np.exp(pitch_spread * pitch)
            age = T[:int(5 * cycles * SR / hz)] * hz / cycles  # in decay times
            swing = np.sin(2 * np.pi * cycles * age * (1 + glide * age / 6))
            bubble = swing * np.exp(-age) * (1 - np.exp(-6 * age))
            db = start_db - fade * (s - start) + scatter_db * size
            add(out, s, bubble * undb(db) * pan(1.3))
    return out


# the thick bottle base: modes (frequency [Hz], relative level [dB], t60 [s])
BASE_MODES = [(3910, 5, 0.45), (5700, 2, 0.17), (3965, -8, 0.17), (9660, -16.5, 0.16), (11430, -13.5, 0.35),
              (13300, -21, .1)]
# its bounces: (time [s], relative level [dB], change of the second mode [dB], free ringing [s])
BASE_HITS = [(3.625, -23.5, 2, 0.014), (3.907, -19, -27, 0.03), (3.92, -19, -35, 0.0081),
             (3.984, -26.5, 3, 0.0045), (3.994, -47, 27, 0.038), (4.149, -34, -27, 0.088)]


def bottle_base(choke_s=0.019, scrape_db=-11):
    """Modal ringing cut by contact: the base scrapes, rings until it meets wet stone, and chatters."""
    out = np.zeros((2, N))
    for s, db, second_db, free_s in BASE_HITS:
        modes = [(hz, db + mode_db + (k == 1) * second_db, t60)
                 for k, (hz, mode_db, t60) in enumerate(BASE_MODES)]
        note = choked(ring(modes, width=1.0, attack=0.0015), free_s, choke_s)
        add(out, s, chatter(note, depth=0.24, top_hz=300) * pan(3.34))
        add(out, s, scrape(db + scrape_db, fall_s=0.006) * pan(3.8))
    return out


# the debris and its echo fall silent for a while: (from [s], to [s])
HUSH = (2.019, 2.3)


def scene():
    """Superposition of all the glass, its echo and the open air."""
    vessels = rolling() + bottle_wall() + bottle_song() + bottle_base() + lids_and_contents()
    debris = crashes() + snaps() + shards() + skitter() + clinks() + chips() + plops() + gurgle()
    heard = uniform_filter1d(1. * ((T < HUSH[0]) | (T > HUSH[1])), size=100)
    return vessels + stairway(vessels) + heard * (debris + stairway(debris)) + air()


def record(dry):
    """Clipping and band limiting: the recorder flattens the tallest peaks and cuts the top."""
    low_pass = signal.ellip(10, .2, 70, TOP_HZ, fs=SR, output="sos")
    return signal.sosfilt(low_pass, np.clip(dry, -1, 1))


dry = scene()
out = record(dry)
master(out)
```